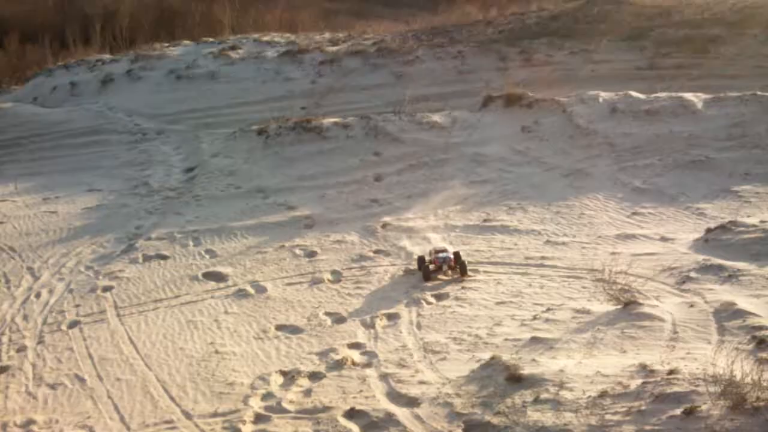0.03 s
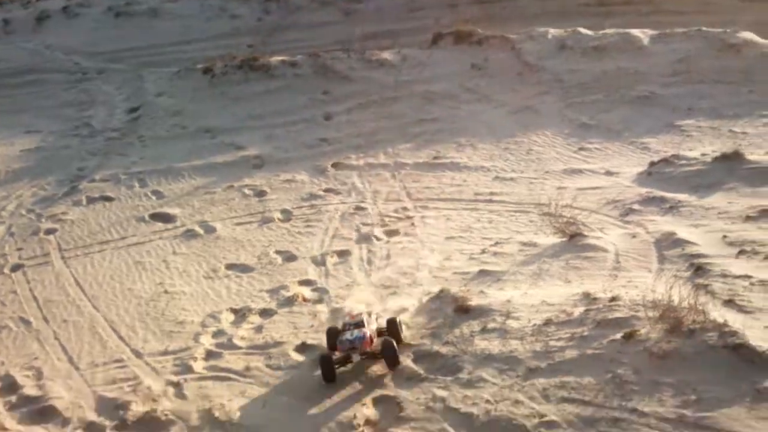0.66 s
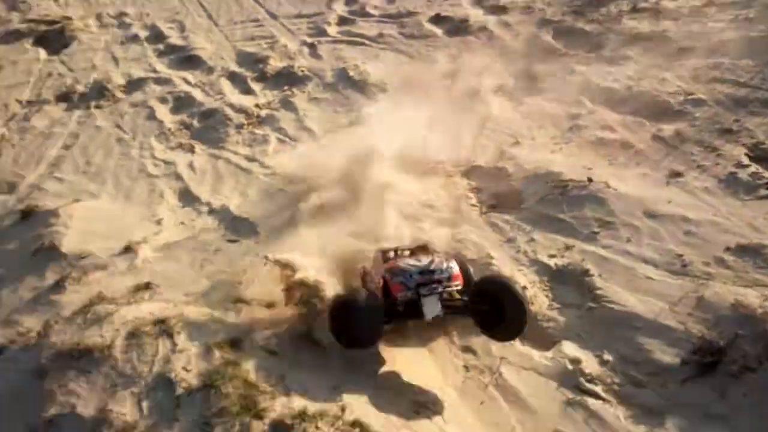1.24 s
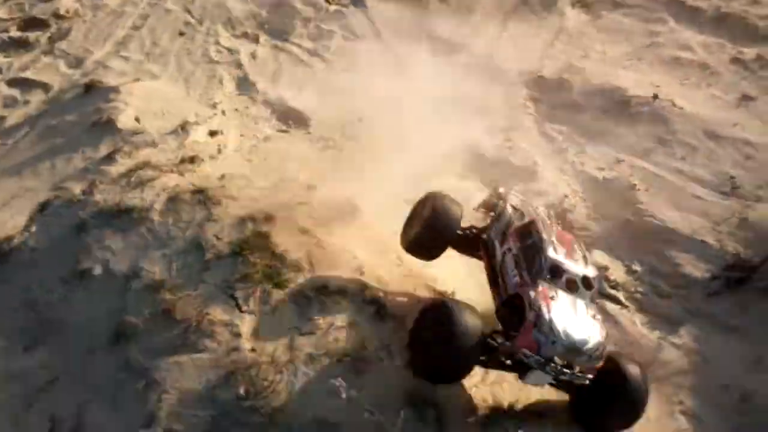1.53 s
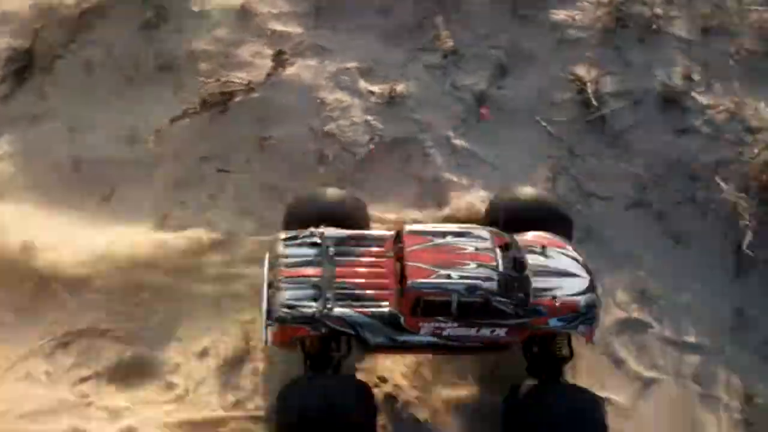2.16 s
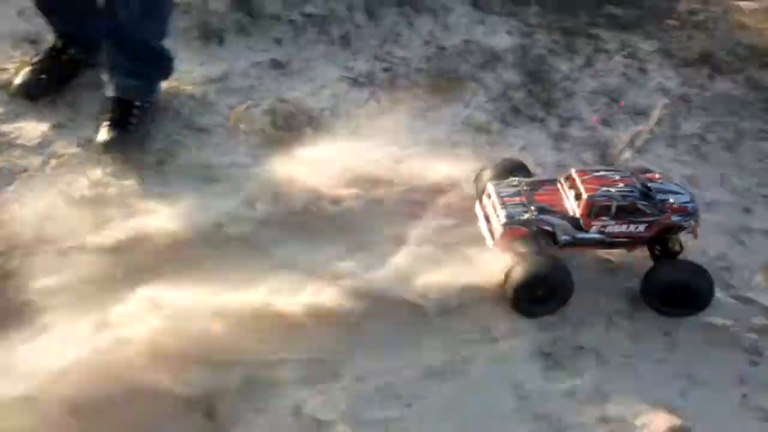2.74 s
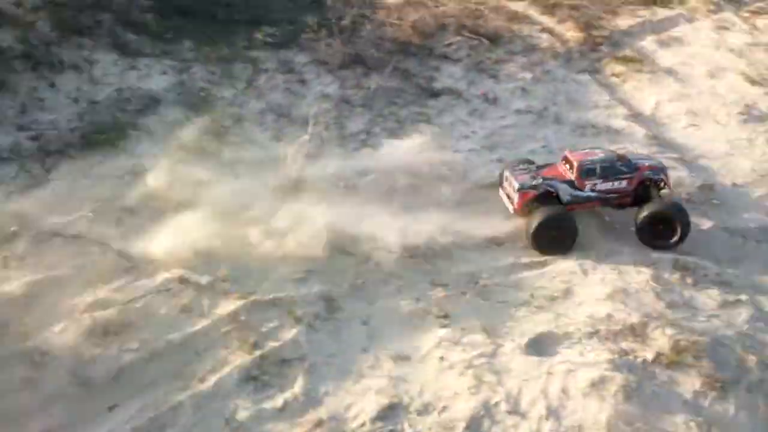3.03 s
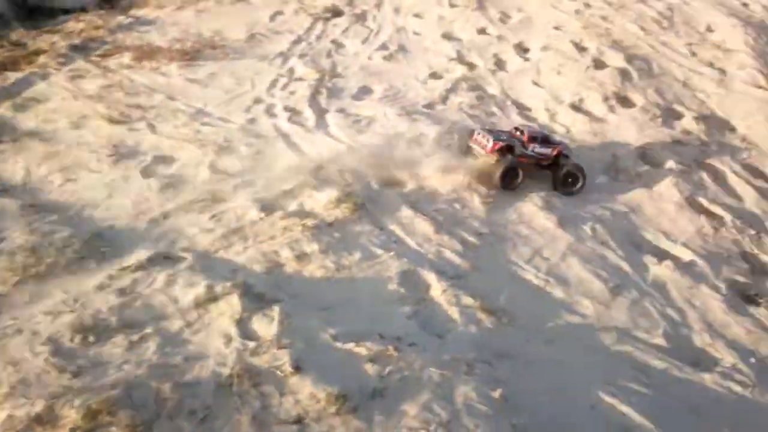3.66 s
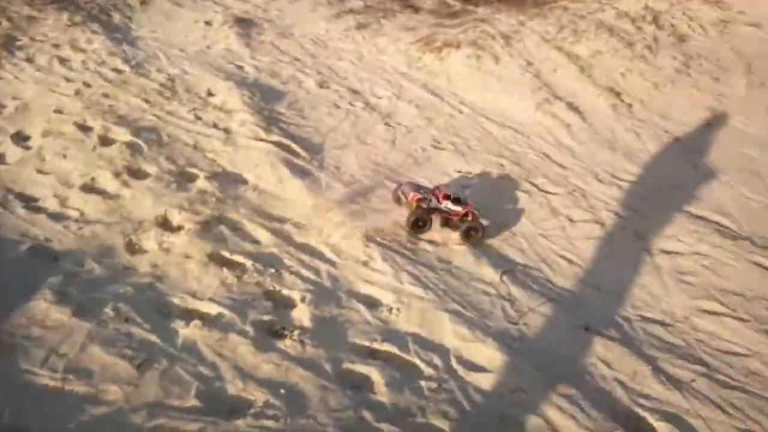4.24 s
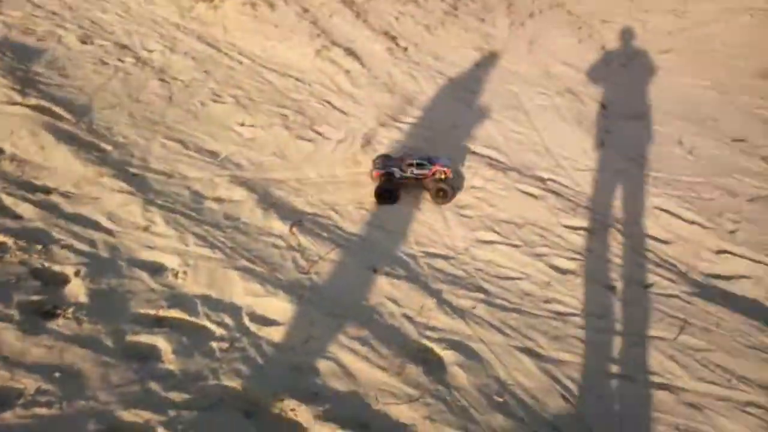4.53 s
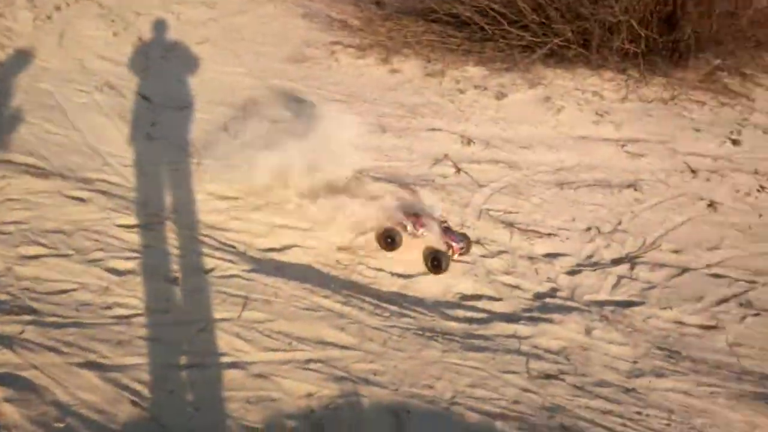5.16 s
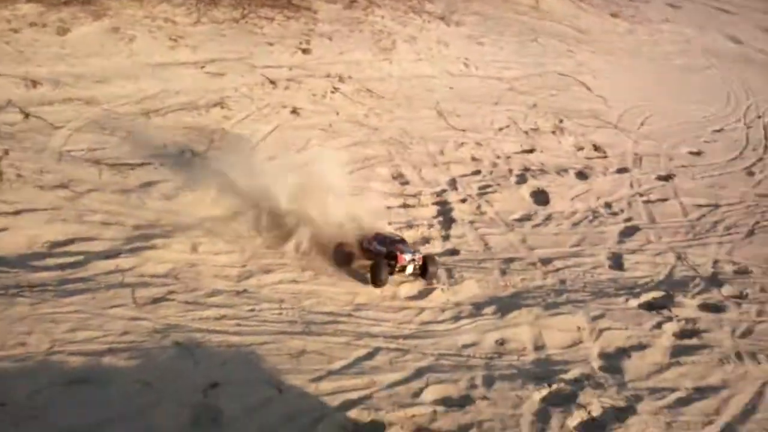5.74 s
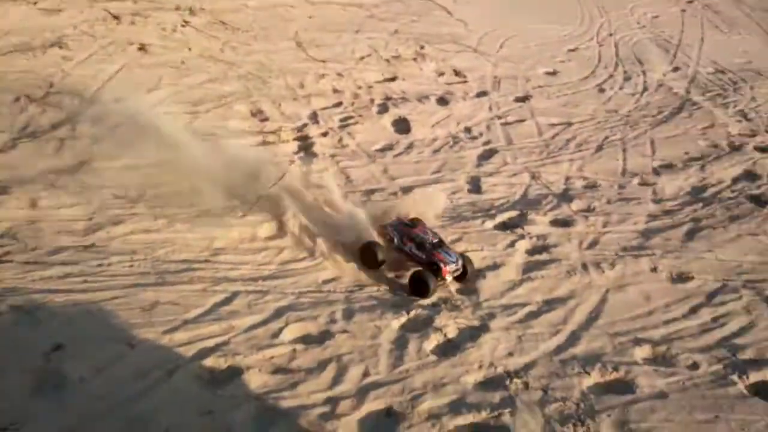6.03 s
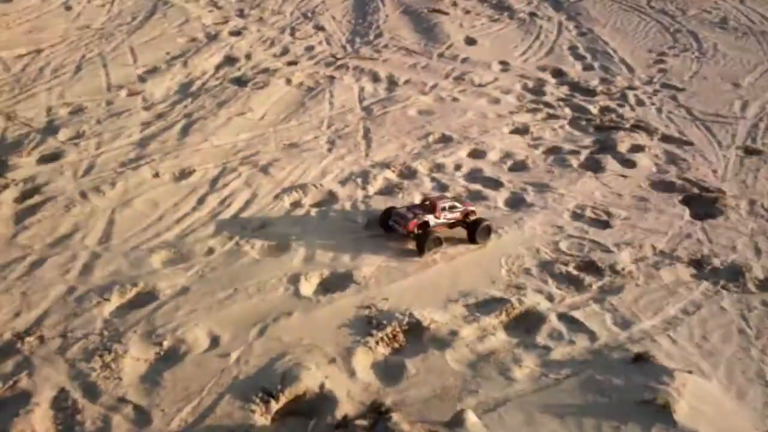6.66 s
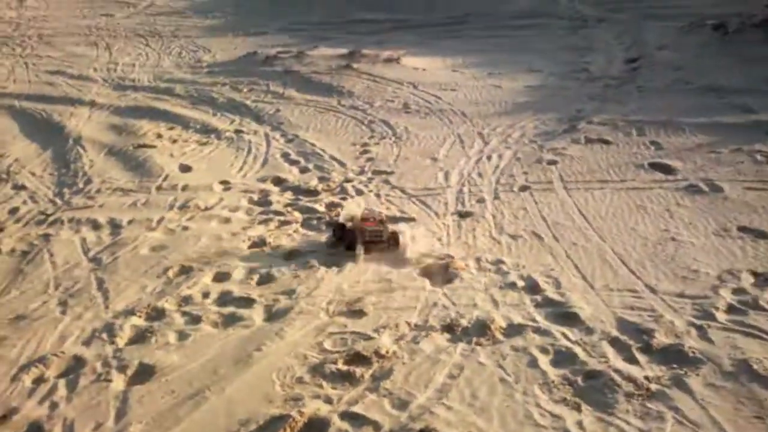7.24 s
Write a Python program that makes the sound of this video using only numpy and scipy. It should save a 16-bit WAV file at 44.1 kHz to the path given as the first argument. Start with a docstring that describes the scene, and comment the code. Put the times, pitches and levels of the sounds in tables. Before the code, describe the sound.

A small electric remote-control truck whines up and down, rattling through sand as it passes close, with wind buffeting the microphone.

```python
"""Model truck in sand and wind

A small electric model truck races up through loose sand, passes close, circles off, coasts and pulls
away. Its gears whine at harmonics of the tooth-meshing rate, while random impacts excite the resonances
of its plastic body and hollow tyres, which churn and throw sand. Turbulent gusts buffet and overload
the microphone of a hand-held camera with a narrow treble range."""
import sys
import numpy as np
from scipy import signal
from scipy.fft import rfft, irfft, next_fast_len
from scipy.io import wavfile
from scipy.ndimage import uniform_filter1d

SR = 44100
rng = np.random.default_rng(int(sys.argv[2]) if len(sys.argv) > 2 else 0)


def output_pcm(signal):
    """Save a mono or channel-first signal as 16-bit PCM at the path in sys.argv[1].

    Samples are clipped to [-1, 1] before scaling.
    """
    pcm = np.clip(np.atleast_2d(signal).T, -1, 1) * 32767
    wavfile.write(sys.argv[1], SR, np.round(pcm).astype(np.int16))


N = 330794
TIME = np.arange(N) / SR


def undb(db):
    return 10 ** (np.asarray(db) / 20)

def unit(x):
    """Normalisation to rms 1."""
    return x / np.sqrt(np.mean(x ** 2))

def curve(table, at=TIME):
    """Linear interpolation of a two-column table, by default over time."""
    return np.interp(at, *np.transpose(table))

def swells(events):
    """Gaussian rises or dips of level, in dB."""
    return sum(db * np.exp(-(2 * (TIME - centre) / length) ** 2) for centre, length, db in events)

def colour(x, spectrum):
    """Spectral shaping, falling 20 dB per octave past the table's ends; rms 1."""
    hz, db = np.transpose(spectrum)
    size = 2 * next_fast_len(N // 2 + 1)
    octave = np.log2(np.maximum(np.fft.rfftfreq(size, 1 / SR), 1))
    outside = np.abs(octave - np.clip(octave, np.log2(hz[0]), np.log2(hz[-1])))
    gain = undb(np.interp(octave, np.log2(hz), db) - 20 * outside)
    return unit(irfft(rfft(x, size) * gain)[:N])

def steady(x, seconds):
    """Division by the running rms evens out the swells of a noise."""
    return x / np.sqrt(uniform_filter1d(x ** 2, int(seconds * SR)) + 1e-9)

def walk(per_s):
    """Low-pass noise made of smoothed random steps; rms 1."""
    hold = max(int(SR / per_s), 2)
    steps = np.repeat(rng.standard_normal(N // 8)[:N // hold + 1], hold)
    return unit(uniform_filter1d(uniform_filter1d(steps, hold), hold)[:N])

def grains(per_s, spread_db):
    """Shot noise: tiny impacts of random timing and size; rms 1."""
    hits = (rng.random(N) < per_s / SR) * rng.choice([-1, 1], N)
    return unit(hits * undb(spread_db * np.clip(rng.standard_normal(N), -2, 2)))


def backlash(mesh_hz, onset_hz=1210, range_hz=350):
    """Backlash: the teeth lose touch at low speed; 0 when fast, 1 when crawling."""
    return np.clip((onset_hz - mesh_hz) / range_hz, 0, 1)

# Drive train speed, jumping as the wheels slip and grip: time_s, mesh_hz
SPEED = [(0.15, 1595), (0.26, 1625), (0.29, 1450.0), (0.33, 1630.0), (0.39, 1743), (0.49, 1480.0),
         (0.61, 1720), (0.64, 1497), (0.68, 1690.0), (0.72, 1506), (0.76, 1680.0), (0.785, 1524),
         (0.83, 1665), (0.9, 1535), (0.94, 1261), (1.095, 1612), (1.14, 1440.0), (1.33, 1630.0),
         (1.375, 1110), (1.5, 1008), (1.61, 1273), (1.695, 558.4), (1.772, 783.6), (1.855, 1130.0),
         (1.93, 1595), (1.99, 1666), (2.055, 1500.0), (2.09, 1633), (2.155, 1558), (2.27, 1093),
         (2.315, 596.7), (2.435, 1123), (2.53, 1227), (2.57, 1342), (2.62, 1616), (2.66, 1625), (2.7, 1465),
         (2.76, 1536), (2.8, 1440.0), (2.92, 1602), (2.97, 1743), (3.02, 1436), (3.105, 1190.0),
         (3.2, 1131), (3.28, 1370), (3.345, 1740), (3.41, 1436), (3.44, 1561), (3.475, 1197), (3.54, 1687),
         (3.67, 1308), (3.81, 775), (3.98, 933), (4.12, 1430), (4.19, 1102), (4.24, 1400.0), (4.28, 815),
         (4.36, 772), (4.51, 1225), (4.58, 1014), (4.68, 1268), (4.83, 1217), (4.92, 1427), (5.03, 1377),
         (5.2, 823.5), (5.39, 832), (5.6, 1421), (5.68, 1740.0), (5.81, 1226), (5.89, 1474), (5.95, 1439),
         (5.995, 1690.0), (6.025, 1490.0), (6.08, 1550.0), (6.115, 1224), (6.175, 1634), (6.195, 1290.0),
         (6.22, 1622), (6.29, 1340), (6.35, 1280.0), (6.41, 963), (6.5, 829.3), (7.31, 832.5), (7.4, 1354),
         (7.45, 1471), (7.5, 1392)]
def mesh_rate():
    """Frequency modulation: rough ground shakes the wheels, and slack gears judder and slip more."""
    speed_hz = curve(SPEED)
    slack = backlash(speed_hz)
    judder = (.011 + .022 * slack) * walk(90)
    slip = (.005 + .035 * slack) * walk(45)
    return speed_hz * (1 + judder + slip)

# The truck's loudness, set by nearness and effort: time_s, level_db
LOUDNESS = [(0.19, -28), (0.96, -25), (1.31, -20), (1.66, -25), (1.8, -16.5), (2.15, -16), (2.36, -19),
            (2.43, -17), (3.2, -20.5), (3.55, -22.5), (3.62, -28), (3.83, -27.5), (3.9, -26), (4.18, -25.5),
            (4.32, -28), (4.39, -25.5), (5.02, -27.5), (5.16, -29.5), (5.23, -33), (5.58, -25),
            (5.79, -25.4), (5.93, -24), (6.35, -25.5), (6.56, -32), (6.63, -31.5), (6.7, -33),
            (6.77, -32.5), (6.84, -33.5), (6.98, -31), (7.19, -34.5), (7.4, -26.5), (7.49, -30.5)]
# Its heading, 1 nose on to the microphone and -1 tail on: time_s, facing_ratio
HEADING = [(.2, 1), (1.3, 0.9), (1.9, 0.15), (2.85, 0.97), (3.1, -0.71), (4.2, -0.91), (5.2, 0.39),
           (6.0, 0.72), (6.6, -0.7), (7.5, -.4)]
def source_gain(share_db, doubling_db, nose_db, growth, cruise_hz=1400, cruise_db=-25):
    """Directivity, doublings of speed and the truck's loudness set one source's share of the sound."""
    loud_db = curve(LOUDNESS)
    speed_db = doubling_db * np.log2(curve(SPEED) / cruise_hz)
    facing_db = nose_db * curve(HEADING)
    return undb(loud_db + share_db + speed_db + facing_db + growth * (loud_db - cruise_db))

# Spells with the throttle let go: start_s, length_s
COASTS = [(1.522, 0.043), (1.646, 0.076), (2.295, 0.032), (3.69, .04), (3.758, 0.11), (4.295, 0.035),
          (5.202, 0.12), (6.673, 0.048), (6.819, .11)]
def coasting_db(drop_db=-5, ramp_s=.015):
    """Reduced excitation: gear noise drops while the throttle is released."""
    released = sum((TIME > start) & (TIME < start + length) for start, length in COASTS)
    return drop_db * uniform_filter1d(released * 1., int(ramp_s * SR))

def gear_tone(cycles, flutter_db, rough):
    """Uneven tooth contact modulates one partial in amplitude and phase."""
    flutter = undb(flutter_db * np.clip(walk(130), -2, 1.2))
    shake = flutter * (1 + rough * walk(500))
    return unit(shake * np.sin(2 * np.pi * cycles + rough * walk(450)))

# Whine relative to the truck's loudness: time_s, mesh_db, octave_db
WHINE = [(.19, -3, 0.5), (1.27, -.5, -3.5), (1.38, -2.5, 2), (1.46, -8, -13), (1.65, -11, -9),
         (1.8, -14, -11), (1.9, 6, -2), (2.19, -2, -4), (2.27, 5.5, -2), (2.34, 6.5, -6), (2.44, 7, -1),
         (2.52, 0.5, 0), (2.9, 1.5, -1.5), (3.05, -3.5, -1.5), (3.67, -6, -1.5), (3.79, -8, -8),
         (3.91, -5.5, -7.5), (4.39, -6, -8), (5.05, 1.5, -1.5), (5.25, -9, -11), (5.42, -2, -4),
         (5.7, -4, -5.5), (6.07, 5.5, 5.5), (6.18, 4.5, 4.5), (6.24, -7, -6.5), (6.4, 1, -7),
         (6.5, -25, -12), (6.79, -23, -8), (7.49, 1, -6)]
# Body's radiation of the mesh tone and its octave: frequency_hz, gain_db
RADIATION = [(600, -13.5), (950, -3.5), (1150, -3), (1350, -8.5), (1530, 0), (1700, -9), (2100, -4.5),
             (2400, -4.5), (2800, 2), (3200, -3), (3500, 2.5)]
# Flares of the upper whine at stabs of throttle, and one dip: centre_s, length_s, change_db
THROTTLE_STABS = [(1.09, 0.055, 5.5), (1.795, .06, 20), (2.12, 0.088, 11), (2.45, 0.095, 5),
                  (2.56, 0.11, 5), (3.28, .06, 1), (3.48, 0.052, 4), (4.04, 0.052, 11.5), (4.15, .05, 4),
                  (4.25, 0.039, 10.5), (5.9, 0.054, 4.5), (6.17, .04, -3)]
def gear_whine(teeth, mesh_hz, stutter_db=10, trim_db=.3):
    """Forced vibration: the body radiates the mesh tone and its octave, which stutter with backlash."""
    time_s, mesh_db, octave_db = np.transpose(WHINE)
    stutter = backlash(mesh_hz) * np.minimum(walk(76), .6)
    drive_db = curve(LOUDNESS) + coasting_db() + stutter_db * stutter + trim_db
    mesh_db = np.interp(TIME, time_s, mesh_db) + curve(RADIATION, mesh_hz)
    octave_db = np.interp(TIME, time_s, octave_db) + curve(RADIATION, 2 * mesh_hz)
    mesh = undb(mesh_db) * gear_tone(teeth, flutter_db=3, rough=.29)
    octave = undb(octave_db + swells(THROTTLE_STABS)) * gear_tone(2 * teeth, flutter_db=3.6, rough=.42)
    return undb(drive_db) * (mesh + octave)

# Body's radiation of the final drive: frequency_hz, gain_db
FINAL_RADIATION = [(300, -0.5), (450, 0), (570, 0.5), (640, -3.5)]
def final_drive_hum(teeth, mesh_hz, ratio=.39):
    """Gear reduction: the final drive meshes more slowly and hums below the motor gear."""
    gain = source_gain(share_db=-11.5, doubling_db=7, nose_db=.8, growth=.27)
    radiation = undb(curve(FINAL_RADIATION, ratio * mesh_hz))
    return gain * radiation * gear_tone(ratio * teeth, flutter_db=8.5, rough=.092)

# Response of the gearbox housing: frequency_hz, gain_db
HOUSING = [(900, -14), (1550, 14), (1900, 10), (2300, -6), (2800, 2), (3200, -0.5), (3600, -27.5),
           (4100, -6.5), (4700, -5.5), (5100, -16), (5700, -5), (6700, -18.5)]
def gear_overtones(teeth, mesh_hz):
    """Resonance: the third and fourth harmonics flare as they sweep through the housing's modes."""
    gain = source_gain(share_db=-4, doubling_db=3, nose_db=2, growth=-.09)
    third = undb(curve(HOUSING, 3 * mesh_hz) - 3) * gear_tone(3 * teeth, flutter_db=4, rough=.45)
    fourth = undb(curve(HOUSING, 4 * mesh_hz)) * gear_tone(4 * teeth, flutter_db=3, rough=.25)
    return gain * undb(coasting_db() + .2 * swells(THROTTLE_STABS)) * (third + fourth)

def clatter(teeth, depth_db, teeth_per_turn=20):
    """Periodic modulation: play in the gears repeats a level pattern with each turn of a shaft."""
    pattern = unit(rng.standard_normal(teeth_per_turn))
    repeated = np.interp(teeth, np.arange(teeth_per_turn), pattern, period=teeth_per_turn)
    return unit(undb(depth_db * repeated))

# Swells and dips of rasp and spray as spinning tyres fling sand: centre_s, length_s, change_db
FLINGS = [(.2, .2, 1.5), (.6, 0.18, 2), (1.36, 0.045, 8.5), (1.61, 0.047, 7), (2.18, 0.087, -2.5),
          (2.7, 0.15, 6), (3.35, 0.22, 6), (4.57, 0.1, -2), (6.3, .2, 3.5), (7.42, .18, 6)]
def gear_rasp(teeth, multiple=3.68):
    """Narrow-band noise: a rough band of gear sound centred on a multiple of the mesh rate."""
    gain = source_gain(share_db=-9.5, doubling_db=13, nose_db=.6, growth=.09)
    phase = 2 * np.pi * multiple * teeth
    band = unit(walk(650) * np.cos(phase) + walk(650) * np.sin(phase))
    return gain * undb(swells(FLINGS)) * clatter(teeth, depth_db=2.5) * band

# Spectrum of the hollow tyres: frequency_hz, level_db
TYRES = [(250, -6), (400, -5), (560, -2.5), (720, -1.5), (820, 1), (930, 0.5), (1050, -8), (1300, -10)]
def tyre_drumming(scoops):
    """Impact excitation: the hollow tyres drum as they scoop the sand."""
    gain = source_gain(share_db=-11, doubling_db=-2.5, nose_db=-1, growth=.15)
    return gain * colour(scoops * grains(2500, spread_db=2.5), TYRES)

# Resonances of the plastic body and of the gearbox: frequency_hz, level_db
CHASSIS = [(150, -23), (420, -0.5), (800, -24.5), (1000, 0), (1150, 2), (1350, 4.5), (1580, 5), (1800, -1),
           (1960, 4), (2200, -15), (3000, -33.5)]
GEARBOX = [(1700, -19), (2200, -2), (2500, -2), (2800, 3), (3150, -0.5), (3450, -1.5), (3700, -5.5),
           (4500, -22.5)]
# Chatter as the wheels dig in: centre_s, length_s, rise_db
JOLTS = [(1.507, 0.065, 5), (1.626, .05, 7.5), (1.77, 0.034, 4.5), (2.248, 0.061, 2.5), (2.36, .04, 1),
         (3.58, 0.048, 6.5), (3.67, 0.043, 8), (3.746, 0.028, 3), (4.143, .05, 4), (4.378, 0.024, 4),
         (5.617, 0.047, 5), (6.31, 0.095, 5.5), (6.96, .04, 6)]
def drive_rattle(shaking):
    """Structure-borne sound: loose parts strike and ring the body and the gearbox."""
    chassis = colour(shaking * grains(3500, spread_db=3), CHASSIS)
    chassis *= source_gain(share_db=-7, doubling_db=-1, nose_db=2.5, growth=.0349)
    gearbox = colour(shaking * grains(5000, spread_db=1), GEARBOX)
    gearbox *= source_gain(share_db=-5.6, doubling_db=0, nose_db=.66, growth=.12)
    return undb(swells(JOLTS)) * (chassis + undb(coasting_db()) * gearbox)

# Spectra of churned sand and of spray striking the shell: frequency_hz, level_db
SAND = [(2900, -51), (3650, -2.5), (4080, 6.5), (4400, 2), (4800, 3), (5200, 5.5), (5600, -17.5),
        (6500, -11)]
SPRAY = [(4600, -24), (5150, -18), (5400, -0.5), (5950, -4), (6150, -8), (6450, -7), (6650, -17.5),
         (7500, -23.5), (8500, -55)]
def sand_hiss(scoops):
    """Granular noise: impacts of churned and flung sand merge into a hiss that rises with each jolt."""
    churn = undb(.5 * coasting_db()) * colour(scoops * grains(9000, spread_db=2.5), SAND)
    churn *= source_gain(share_db=-4, doubling_db=2.5, nose_db=-1.36, growth=0)
    spray = undb(swells(FLINGS)) * colour(scoops * grains(7000, spread_db=4.5), SPRAY)
    spray *= source_gain(share_db=-9, doubling_db=4, nose_db=1.4, growth=.22)
    return undb(.4 * swells(JOLTS)) * (churn + spray)

# Spectrum of the crackle: frequency_hz, level_db
CRACKLE = [(3000, -21.5), (5500, -28), (6800, 9.5), (7800, -1), (8600, 0.5)]
def treble_crackle():
    """Brightness: a fine high crackle at the top of the treble rises when the truck is loud and close."""
    gain = source_gain(share_db=-23, doubling_db=1.5, nose_db=6.5, growth=1.02)
    return gain * colour(grains(1200, spread_db=3.5), CRACKLE)

# Draught under the gusts: time_s, level_db
DRAUGHT = [(.15, -19), (2.1, -24.5), (3.65, -33), (4.7, -28), (5.98, -32), (6.4, -43), (6.7, -44),
           (7.15, -39.5), (7.5, -42)]
# Gusts on the microphone: start_s, hold_s, level_db
GUSTS = [(0.183, 0.054, -9.5), (0.296, .1, -15), (0.39, 0.19, -10.5), (0.656, 0.21, -10.5),
         (0.942, .01, -11.5), (1.026, .13, -11), (1.22, .09, -14), (1.4, 0.042, -18.5),
         (1.662, 0.076, -18.5), (1.842, 0.051, -15), (2.209, 0.22, -14), (2.458, 0.051, -21),
         (2.8, 0.043, -19.5), (2.999, .11, -20), (3.858, .04, -22.5), (3.972, 0.055, -14.5),
         (4.21, 0.062, -16), (4.334, 0.075, -15), (4.911, 0.2, -18.5), (5.162, 0.017, -15),
         (5.264, 0.11, -21.5), (5.45, 0.35, -25.5), (7.218, 0.0091, -23.5), (7.305, .015, -17)]
def wind_strength_db(attack_s=.032, release_s=.064):
    """Exponential growth and decay: each gust rises, holds and sinks back into the draught."""
    strength = undb(curve(DRAUGHT))
    for start, hold, db in GUSTS:
        fade = np.maximum(start - TIME, 0) / attack_s + np.maximum(TIME - start - hold, 0) / release_s
        strength = np.maximum(strength, undb(db) * np.exp(-np.minimum(fade, 20)))
    return 20 * np.log10(strength)

# Pressure spectra of the eddies: frequency_hz, level_db
SLOW_EDDIES = [(8, -15.5), (22, 1), (45, -0.1), (85, -1), (125, -1.5), (200, -9), (320, -24.5), (700, -56)]
FAST_EDDIES = [(70, 2.5), (140, -6.5), (200, -1.5), (280, -5.5), (400, -10), (600, -17), (1200, -36),
               (2500, -46)]
def wind(buffet_db=2, buffets_per_s=24, full_gust_db=-10.5):
    """Turbulence: eddies push the microphone's membrane, and harder gusts break into more fast ones."""
    gust_db = wind_strength_db() + buffet_db * np.clip(walk(buffets_per_s), -2, 1.5)
    fast_share = np.minimum(undb(-2.5 + .41 * (gust_db - full_gust_db)), .9)
    slow = steady(colour(rng.standard_normal(N), SLOW_EDDIES), seconds=.081)
    bursts = rng.standard_normal(N) * undb(6.2 * walk(70))
    fast = steady(colour(bursts, FAST_EDDIES), seconds=.06)
    eddies = np.sqrt(1 - fast_share ** 2) * slow + fast_share * fast
    push = undb(gust_db - 3) * (1 + 1.7 * undb(gust_db))  # strong gusts push ever harder
    return push * eddies

# Spectra of a knock's two parts: frequency_hz, level_db
THUD = [(80, -29.5), (250, 3), (520, 24), (750, -10), (1400, -13), (3000, -47)]
TICK = [(700, -8.5), (1500, 12), (2200, -9), (3000, -1), (4000, 0), (5500, -14), (8000, -17)]
# Knocks of the chassis: start_s, thud_db, tick_db
KNOCKS = [(0.944, -6, -26), (1.422, -22, -15), (1.624, -24, -12), (1.746, -20, -10), (2.164, -26, -5),
          (2.232, -8, -16), (2.345, -8, -14), (3.668, -28, -14), (3.745, -28, -18), (6.961, -19, -28),
          (7.414, -17, -13)]
def knocks(thud_decay_s=.0017, tick_decay_s=.0015):
    """Damped transients: each knock is a dull thud of the chassis with a hard tick on top."""
    thud = steady(colour(rng.standard_normal(N), THUD), seconds=.0023)
    tick = steady(colour(rng.standard_normal(N), TICK), seconds=.0023)
    out = np.zeros(N)
    for start_s, thud_db, tick_db in KNOCKS:
        start = int(start_s * SR)
        age = TIME[:min(SR // 10, N - start)]
        span = slice(start, start + len(age))
        out[span] += undb(thud_db) * thud[span] * np.exp(-age / thud_decay_s)
        out[span] += undb(tick_db) * tick[span] * np.exp(-age / tick_decay_s)
    return out

def scene():
    """Superposition: gears locked to one speed add to the rattle, sand, crackle, knocks and wind."""
    mesh_hz = mesh_rate()
    teeth = np.cumsum(mesh_hz) / SR  # mesh phase in cycles
    gears = gear_whine(teeth, mesh_hz) + final_drive_hum(teeth, mesh_hz)
    gears += gear_overtones(teeth, mesh_hz) + gear_rasp(teeth)
    shaking = unit(undb(1.94 * walk(45))) * clatter(teeth, depth_db=.5)
    scoops = unit(undb(1.3 * walk(40))) * clatter(teeth, depth_db=.5)
    impacts = tyre_drumming(scoops) + drive_rattle(shaking) + sand_hiss(scoops)
    return (gears + impacts + treble_crackle() + knocks() + wind())[None]

def overload(x, ceiling=.37, treble_share=.6, bass_hz=900):
    """Saturation: the membrane runs out of travel, sooner for bass than for treble."""
    bass = signal.sosfiltfilt(signal.butter(2, bass_hz, fs=SR, output="sos"), x)
    travel = (bass + treble_share * (x - bass)) / ceiling
    return x / (1 + travel ** 6) ** (1 / 6)

def record(dry, on_s=.16, ramp_s=.006, top_hz=8300):
    """Band limiting: the camera's sound comes on, overloads in gusts and loses its top treble."""
    switch_on = np.clip((TIME - on_s) / ramp_s, 0, 1)
    lowpass = signal.butter(16, top_hz, fs=SR, output="sos")
    return signal.sosfiltfilt(lowpass, switch_on * overload(dry))


dry = scene()
out = record(dry)
output_pcm(out)
```